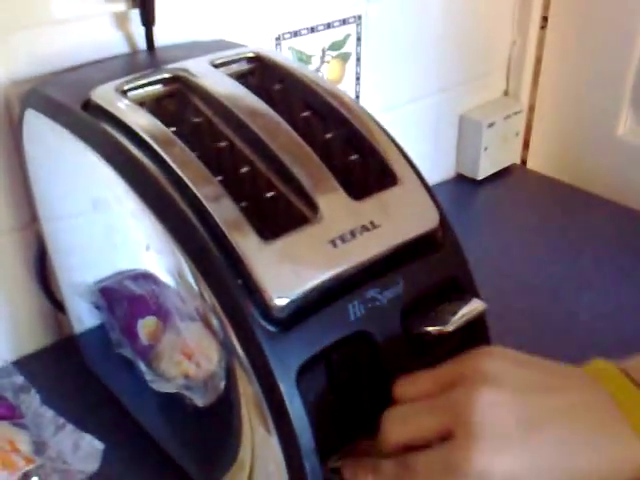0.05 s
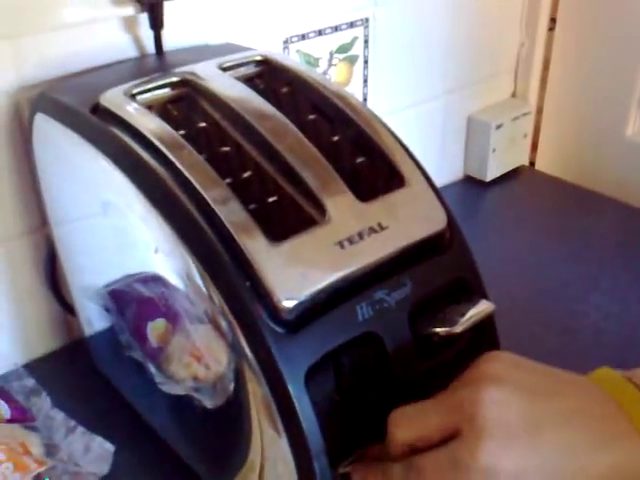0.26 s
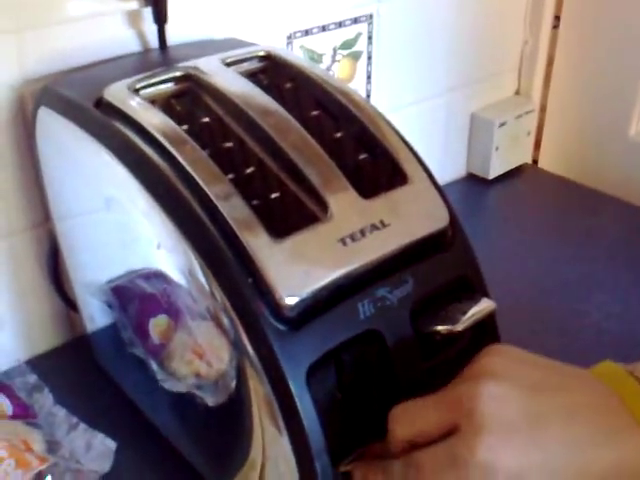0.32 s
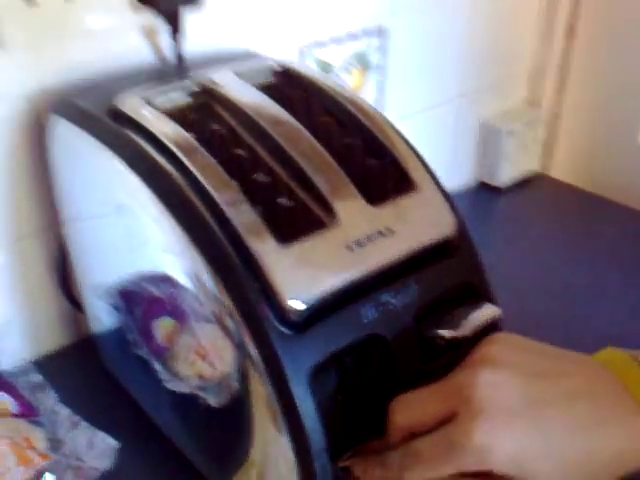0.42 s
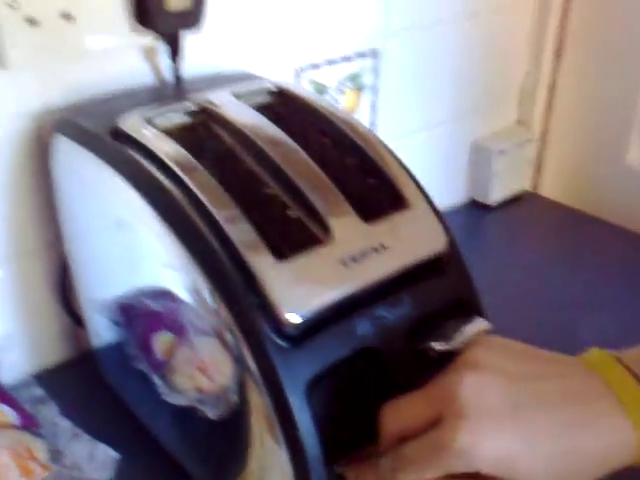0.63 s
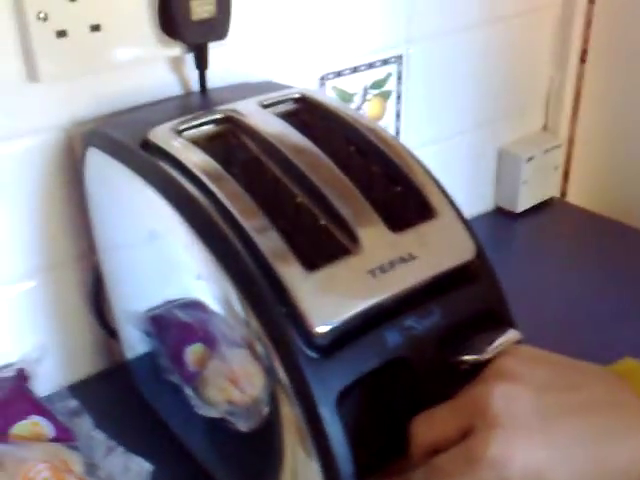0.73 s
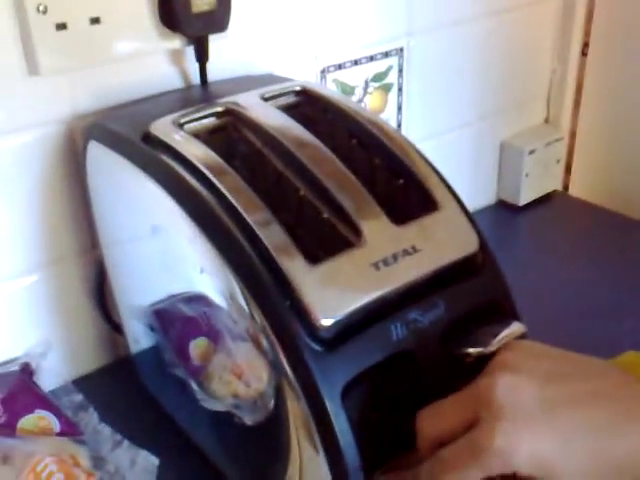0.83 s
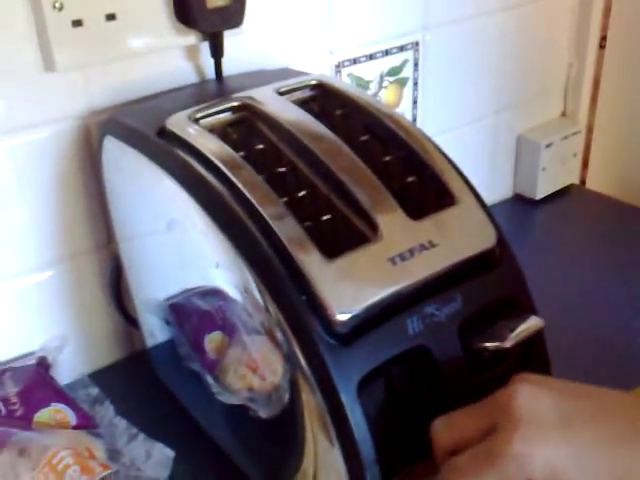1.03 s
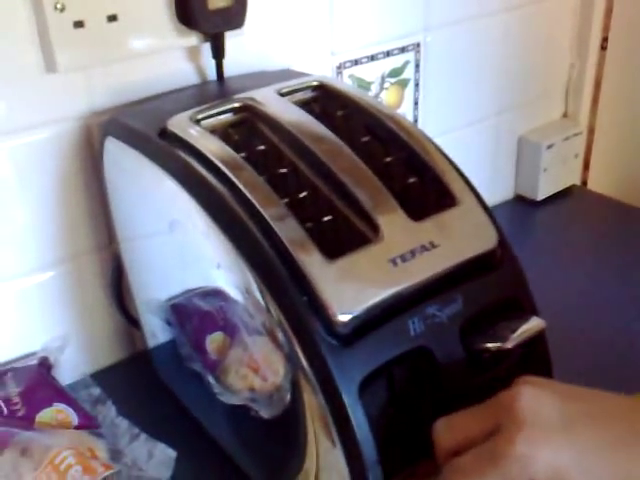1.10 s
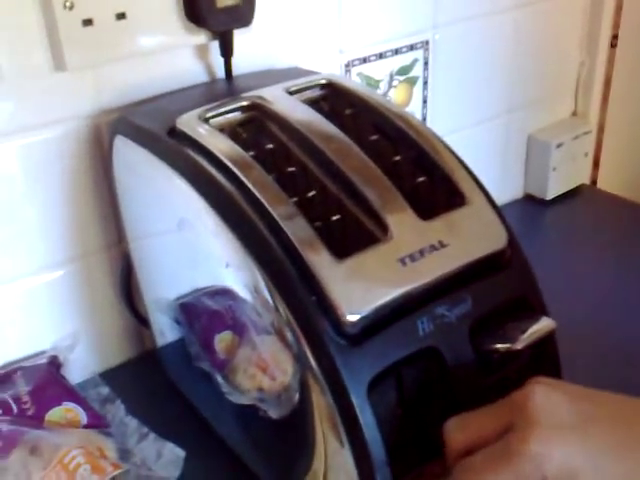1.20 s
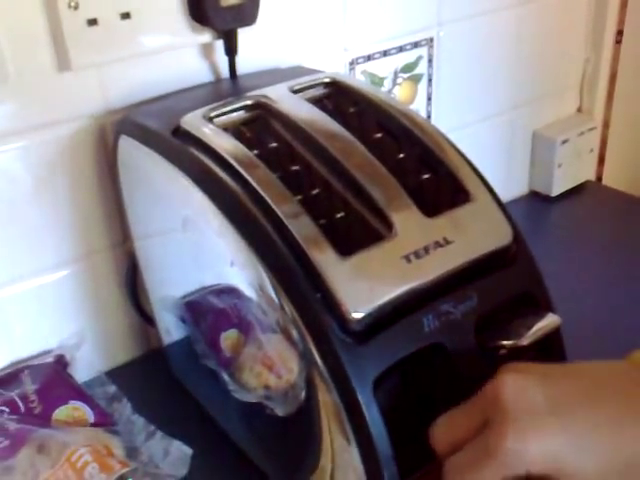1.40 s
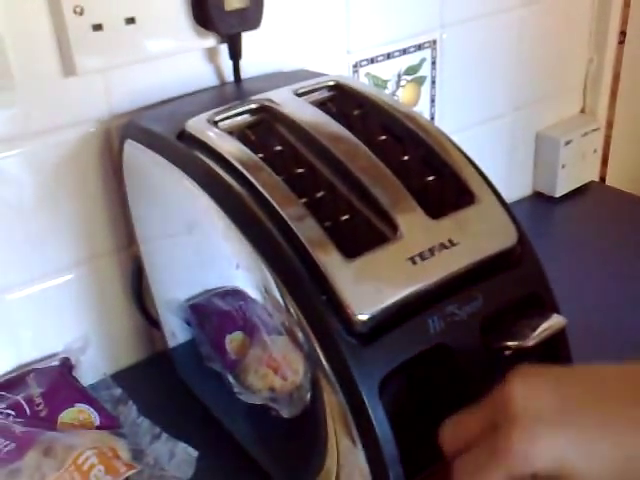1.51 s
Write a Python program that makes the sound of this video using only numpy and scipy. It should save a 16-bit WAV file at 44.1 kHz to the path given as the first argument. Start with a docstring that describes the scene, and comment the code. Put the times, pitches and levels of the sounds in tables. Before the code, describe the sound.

Toaster lever clanks down hard, followed by two lighter rattling strokes and a plastic click.

```python
"""A toaster on the worktop of a quiet kitchen, close to one microphone. A hand pushes the lever hard:
the sprung carriage scrapes along its guide and knocks against its stops, shaking the case, the steel
frame and the thin wire racks; the latch cracks and the feet thump on the worktop. A lighter stroke
follows, then a faint ping of the spring, then a third stroke. Last, the hand flicks a plastic control."""
import sys
import numpy as np
from scipy import signal
from scipy.fft import rfft, irfft
from scipy.io import wavfile

SR = 44100
rng = np.random.default_rng(int(sys.argv[2]) if len(sys.argv) > 2 else 0)


def pcm_store(signal):
    """Save signal as 16-bit PCM."""
    levels = np.round(np.clip(np.atleast_2d(signal), -1, 1) * 32767)
    wavfile.write(sys.argv[1], SR, levels.astype(np.int16).T)


N = 68355
T = np.arange(N) / SR

# The carriage knocks. Each row: time in seconds, strength in dB in the case, the frame and the racks.
KNOCKS = [(.0645, -7.5, -14, -8.5), (.141, -26, -24.5, -13.5), (0.175, -29, -15, -3), (.209, 8.5, -4, 7.5),
          (0.2167, 8.5, 2, 9), (0.239, -32, -2, 19), (.276, -4, -6.5, 12), (0.311, 9.5, 11, 17),
          (0.3239, 3, 12, 22.5), (.331, 3.5, 13, 6), (0.361, -8, 7.5, 17), (0.42, -34, -4.5, -6),
          (0.475, -21, -4.5, -3), (0.6962, -13.5, -2.5, 8), (0.74, -33, -6, 8.5), (0.941, -24, -13.5, -3.5),
          (0.952, -25, -27, -8.5), (1.068, -30.5, -26, -24), (1.1062, -28, -17, -3.5), (1.151, -10, -7, 6),
          (1.182, -6.5, -11, 7), (1.1875, -4, 5, -7), (1.225, -1.5, 2, 3), (1.2332, -8, -2, -12)]
# The carriage slides, one list a stroke. Each row: time in seconds, then friction level,
# brightness, pressure on the frame and worktop rumble, all in dB.
STROKES = [
    [(.062, -58.5, 6, 1, -46.5), (.135, -43.5, -9.5, 0.5, -33.5), (.165, -34, -2, -1, -35.5),
     (.203, -37, -1, 9.5, -31), (.218, -15.5, -2.5, 0.5, -21.5), (.28, -22, 0.5, 0.5, -31),
     (.303, -24, 1, 2, -21.5), (.325, -19.5, -3, -1.5, -34), (.368, -32.5, 5, 2, -29.5),
     (.405, -35, 0, 1, -46), (.455, -38, -1.5, 2, -41.5), (.50, -43.5, -0.5, 2.5, -43),
     (.53, -77.5, -7, 2, -56)],
    [(.696, -33.5, 2.5, -6, -54), (.732, -34, 2, 0.5, -36.5), (.745, -28.5, 3, 1, -52),
     (.775, -34.5, 5, -1.5, -53), (.805, -32.5, 1.5, -4.5, -54), (.86, -41, 4.5, -2, -44.5),
     (.885, -57, 1, -4, -53), (.90, -80, -2, -2, -56)],
    [(1.106, -39, 4.5, -0.5, -40.5), (1.142, -43, -6, -4, -42), (1.153, -24.5, 6.5, 1, -37),
     (1.19, -31, -4.5, -0.5, -43.5), (1.218, -41, 5.5, 0, -44.5), (1.24, -32, -4.5, -5.5, -39.5),
     (1.262, -34.5, -1, -1.5, -42), (1.295, -32, -3, -1, -45), (1.325, -43.5, -2, -2.5, -51),
     (1.36, -57, -19.5, 0, -52.5), (1.40, -63, -9, -5.5, -45.5), (1.46, -66, -12.5, -1.5, -52.5)],
]
# The feet thump. Each row: start in seconds, relative level in dB, pitch in Hz, swell in seconds.
THUMPS = [(0.059, -33.5, 142, .014), (0.2202, -1, 109, 0.015), (0.224, -8.5, 79.8, 0.015),
          (.222, -14, 225.6, 0.017), (.368, -23, 109.3, 0.011), (0.469, -29.5, 92.2, 0.021),
          (0.771, -28.5, 113, 0.014), (1.178, -23.5, 105.7, .013), (1.233, -26.5, 114, 0.013)]
# The control snaps over. Each row: time in seconds, strength in dB.
SNAPS = [(1.5017, 1.5), (1.509, -9), (1.522, -5)]
# Colours of the ringing parts and of the room. Each row: frequency in Hz, relative density in dB.
CASE_COLOUR = [(140, -21), (200, 2.5), (270, -5), (400, -3), (620, -3.5), (900, 2), (1250, -1.5), (1800, 2),
               (2600, -2.5), (3400, -5), (4800, -33)]
FRAME_COLOUR = [(2400, -13), (3600, -14), (4500, 0), (5700, -1.5), (6800, -3), (7700, -6), (9000, -4),
                (11000, -6.5)]
RACK_COLOUR = [(7500, -8), (9500, -15), (10900, -7.5), (11300, -1), (12250, 6), (13200, 5), (14300, -5),
               (15500, -5.5), (17000, -9)]
WORKTOP_COLOUR = [(25, -18), (55, -22.5), (78, -1.5), (105, 1), (132, 3), (162, -20), (195, -5), (245, -6),
                  (310, -14.5), (390, -12.5), (500, -17.5), (650, -28)]
CONTROL_COLOUR = [(150, -2.5), (400, -2), (650, -19), (950, 3), (1550, 2), (2300, 2), (3300, -10.5),
                  (4900, -1), (7000, -9.5), (9500, -23), (12500, -6.5), (16000, -8)]
ROOM_COLOUR = [(25, 2), (45, -0.5), (100, 3), (170, -8), (300, -11.5), (600, -20), (1500, -27), (3500, -29),
               (9000, -38.5), (16000, -33)]
# Clear modes of the steel parts. Each row: frequency in Hz, relative level in dB, t60 in seconds.
SHELL_MODES = [(850, 2, .33), (965, 0, .15), (1528, -10, .25), (1599, -12, .3), (1771, -2, .22),
               (2018, -7, .28), (4467, -3, .27), (4764, -2, .25), (5044, -4, .32), (5447, -3, .24),
               (5760, -6, .15), (6062, -6, .15)]
RACK_MODES = [(11230, -4, .1), (11446, -5, .1), (11803, 0, .1), (12231, 3, .1), (12348, -1, .1),
              (12661, -4, .1), (12844, -4, .15), (13757, -10, .1)]
LATCH_MODES = [(2430, -13.5, .014), (5380, -2, .016), (8560, 2.5, 0.01)]
SPRING_MODES = [(1490, -6, 0.57), (2220, -8.5, .4), (2940, -5, 0.25)]
# Lingering ring of the parts and the kitchen.
# Each row: frequency in Hz, level against the first ring in dB, t60 in seconds.
TAIL = [(200, -14.5, 0.19), (890, -21.5, 0.52), (2320, -8.5, 0.27), (5000, -26.5, 0.32), (8640, -3.5, 0.11),
        (12600, -43.5, 0.26), (16000, -14, .14)]


def carriage(level, bright_db, pressure_db):
    """Knocks and friction shake the case, the frame and the racks; bright contact favours the racks."""
    times, case_db, frame_db, rack_db = np.transpose(KNOCKS)
    judder_db = 1.78 * drift(hz=70)
    friction = level * slips() * amp(judder_db)
    on_case = clicks(times, case_db) + friction * amp(-4 - bright_db)
    on_frame = clicks(times, frame_db) + friction * amp(.5 + pressure_db)
    on_racks = clicks(times, rack_db) + friction * amp(4.5 + bright_db)
    case = shaken(on_case, CASE_COLOUR, t60=.037)
    shell_ring = amp(-40.5) * drive(on_case, modes(SHELL_MODES))
    frame = shaken(on_frame, FRAME_COLOUR, t60=.053)
    racks = shaken(on_racks, RACK_COLOUR, t60=.042)
    free_db = np.where(T > .6, -47, -38)  # the racks ring freely in the first stroke, less afterwards
    rack_ring = drive(amp(free_db) * on_racks, modes(RACK_MODES))
    return case + shell_ring + frame + racks + rack_ring


def sliding():
    """Strength, brightness, frame pressure and rumble of the friction through the three strokes."""
    level, bright_db, pressure_db, rumble = np.zeros((4, N))
    for stroke in STROKES:
        times, level_db, brightness, pressure, rumble_db = np.transpose(stroke)
        moving = (T >= times[0]) & (T < times[-1])
        level += moving * amp(np.interp(T, times, level_db))
        bright_db += moving * np.interp(T, times, brightness)
        pressure_db += moving * np.interp(T, times, pressure)
        rumble += moving * amp(np.interp(T, times, rumble_db))
    return level, bright_db, pressure_db, rumble


def slips(per_second=3500, spread_db=1):
    """Friction as a dense run of tiny slips of uneven size; rms 1."""
    sizes = amp(spread_db * np.minimum(rng.exponential(1, N), 4))
    signs = rng.choice([-1, 1], N)
    slipping = rng.random(N) < per_second / SR
    return unit(sizes * signs * slipping)


def latch():
    """The steel latch cracks once, very short, at the start of the hardest push."""
    return drive(clicks(times=[.2102], db=[-6]), modes(LATCH_MODES))


def worktop(rumble):
    """Under the toaster, the worktop rumbles as the carriage slides and booms as the feet thump."""
    out = amp(1) * shaken(rumble * slips(), WORKTOP_COLOUR, t60=.1)
    for start, db, hz, swell_s in THUMPS:
        age = np.maximum(T - start, 0)
        swell = (age / swell_s * np.exp(1 - age / swell_s)) ** 3
        out += amp(db - 3) * swell * np.sin(2 * np.pi * hz * age)
    return out


def control():
    """The plastic control snaps over, duller than the steel, and rebounds twice."""
    times, db = np.transpose(SNAPS)
    return shaken(clicks(times, db), CONTROL_COLOUR, t60=.051)


def spring():
    """The return spring pings faintly after the second stroke."""
    return drive(clicks(times=[.944], db=[-51.5]), modes(SPRING_MODES))


def room_tone():
    """Steady low hush of the kitchen behind the toaster."""
    hz = np.arange(N // 2 + 1) * SR / N
    spectrum = rfft(rng.standard_normal(N)) * amp(at_hz(ROOM_COLOUR, hz))
    return amp(-48.5) * unit(irfft(spectrum, N))


def shaken(force, colour, t60):
    """As the contact wanders along a part, it stirs changing mixtures of the modes."""
    place = np.pi / 2 * drift(hz=24.7)
    shares = np.cos(place), np.sin(place)
    return sum(drive(force * share, crowded_modes(colour, t60)) for share in shares)


def crowded_modes(colour, t60, build_s=.0037):
    """Ring of countless modes, dying quickly at first, then lingering band by band; unit energy."""
    edges = np.geomspace(30, 18000, 41)  # Hz
    noise = rng.standard_normal((2, N)) * (1 - np.exp(-T / build_s))  # the ring spreads through the part
    out = np.zeros(N)
    for k, (low, high) in enumerate(zip(edges, edges[1:])):
        hz = np.sqrt(low * high)
        if colour[0][0] < hz < colour[-1][0]:
            tail = amp(at_hz(TAIL, hz) - 60 * T / at_hz(TAIL, hz, column=2))
            fade = amp(-60 * T / t60) + tail
            band_pass = signal.butter(2, [low, high], "band", fs=SR, output="sos")
            band = signal.sosfilt(band_pass, noise[k % 2] * fade + 1e-18)
            out += unit(band) * amp(at_hz(colour, hz)) * np.sqrt(high - low)
    return unit(out) / np.sqrt(N)


def modes(table):
    """Ring of a few clear modes, each a dying sine."""
    return sum(amp(db - 60 * T / t60) * np.sin(2 * np.pi * hz * T + rng.uniform(0, 2 * np.pi))
               for hz, db, t60 in table)


def clicks(times, db):
    """One impulse for each contact."""
    out = np.zeros(N)
    np.add.at(out, (np.asarray(times) * SR).astype(int), amp(db))
    return out


def drive(force, response):
    """Sound of a part shaken by a force."""
    return signal.fftconvolve(force, response)[:N]


def drift(hz):
    """Smooth random wander; rms 1."""
    pole = np.exp(-2 * np.pi * hz / SR)
    wander = signal.lfilter([1], [1, -2 * pole, pole * pole], rng.standard_normal(2 * N))
    return unit(wander[N:])


def at_hz(table, hz, column=1):
    """Read a column of a table on a log-frequency axis."""
    rows = np.array(table)
    return np.interp(np.log(np.maximum(hz, 1)), np.log(rows[:, 0]), rows[:, column])


def amp(db):
    """Decibels to gain."""
    return 10 ** (np.asarray(db) / 20)


def unit(x):
    """Scale to rms 1."""
    return x / np.sqrt(np.mean(x ** 2) + 1e-20)


def scene():
    """One microphone close to the toaster, the quiet kitchen behind it."""
    level, bright_db, pressure_db, rumble = sliding()
    toaster = carriage(level, bright_db, pressure_db) + latch() + worktop(rumble) + control() + spring()
    return (toaster + room_tone())[None]


def record(dry, ceiling=.95, cutoff_hz=17000):
    """Behind the microphone, the loudest peaks are rounded and the highest treble is cut."""
    rounded = ceiling * np.tanh(dry / ceiling)
    low_pass = signal.ellip(10, .1, 70, cutoff_hz, fs=SR, output="sos")
    return signal.sosfilt(low_pass, rounded)


dry = scene()
out = record(dry)
pcm_store(out)
```